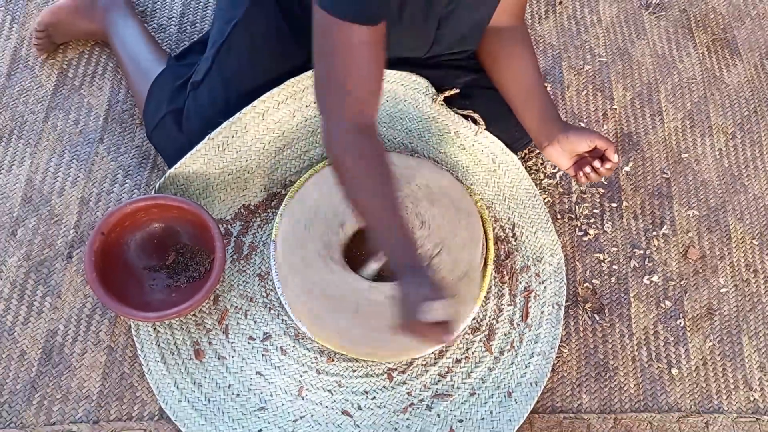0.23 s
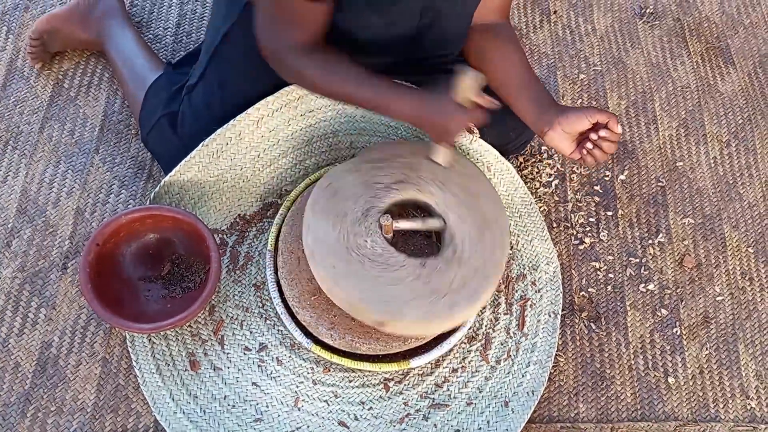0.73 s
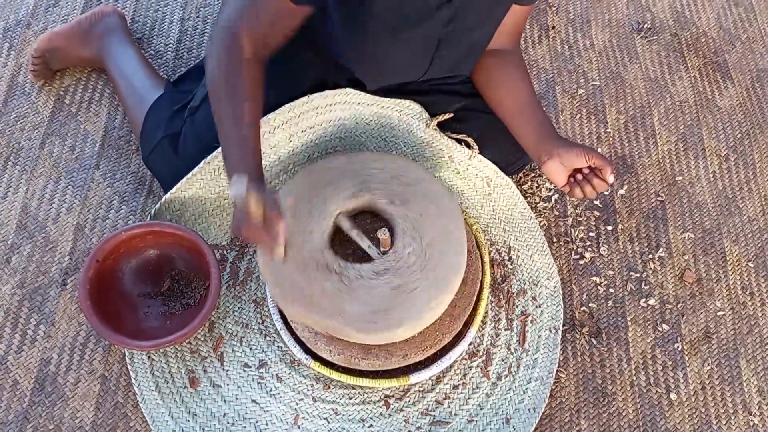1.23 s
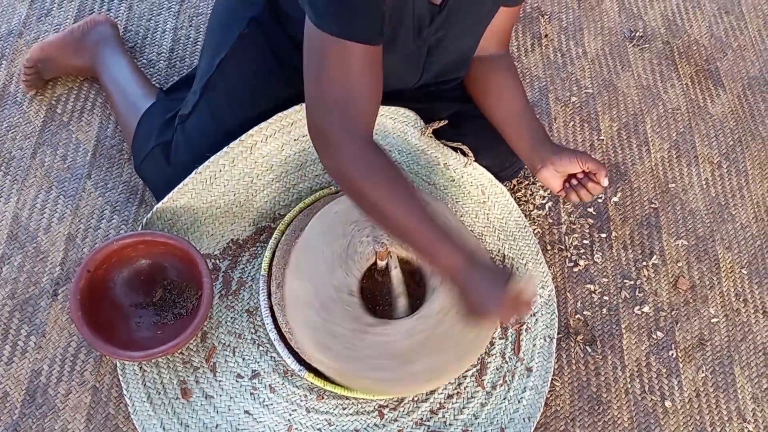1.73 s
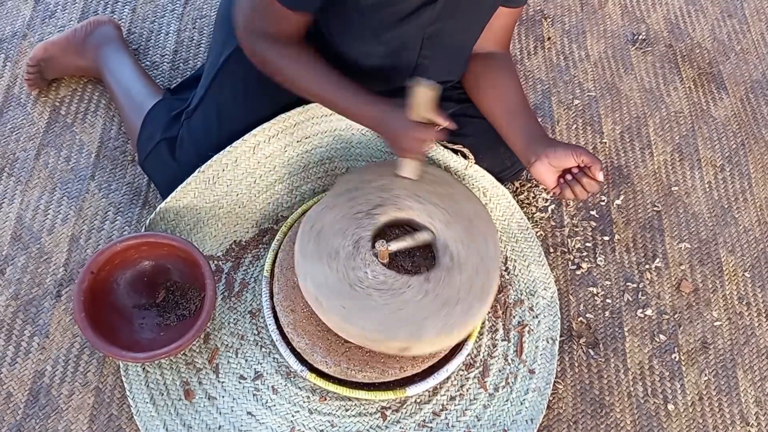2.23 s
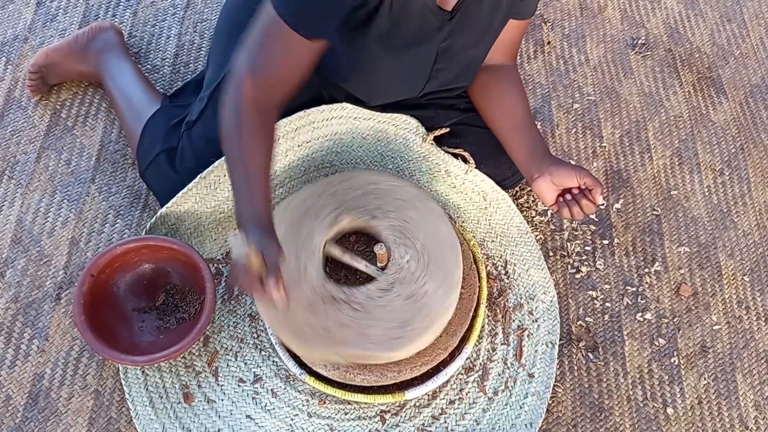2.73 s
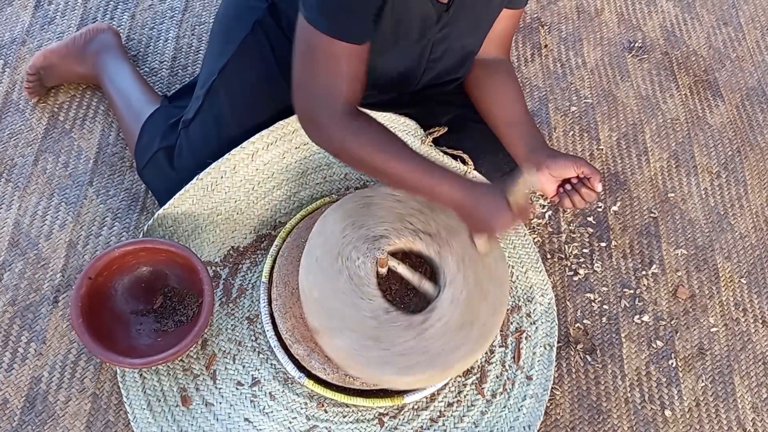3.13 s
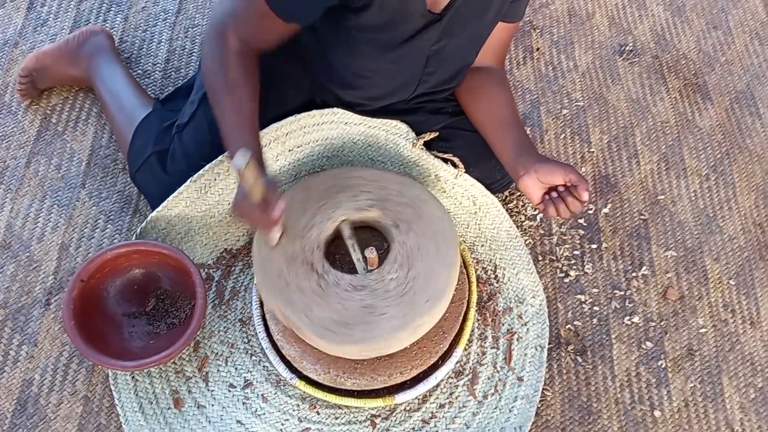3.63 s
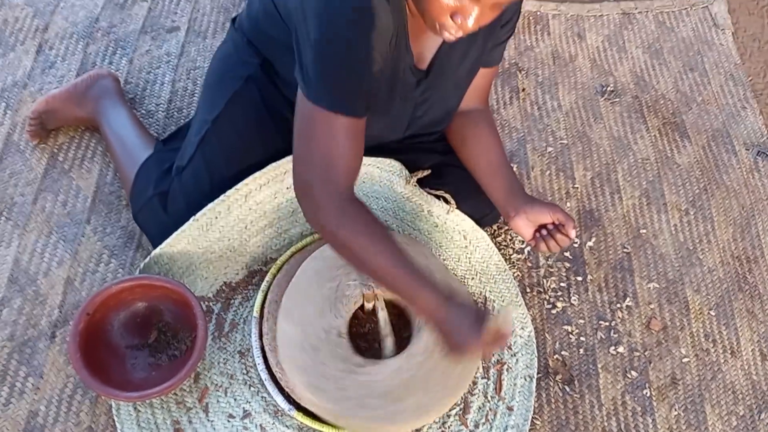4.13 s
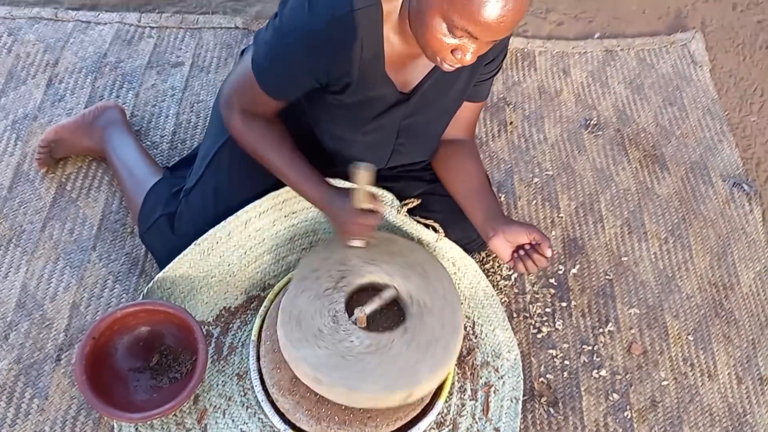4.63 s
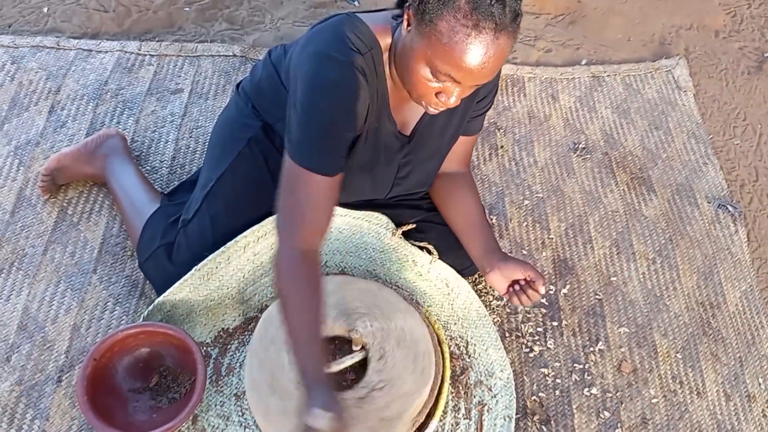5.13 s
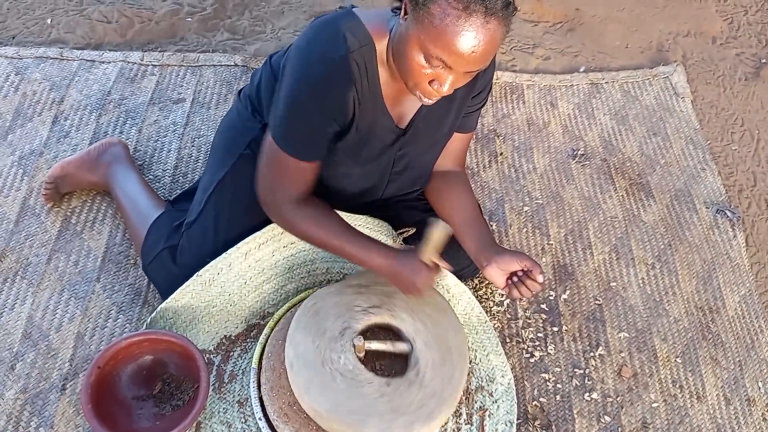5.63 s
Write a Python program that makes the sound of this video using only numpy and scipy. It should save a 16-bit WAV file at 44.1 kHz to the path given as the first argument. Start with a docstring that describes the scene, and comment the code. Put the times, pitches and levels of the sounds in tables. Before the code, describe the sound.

Stone rasps on stone in a rough rhythm, about one turn every 0.8 seconds, with crackling husks, wind thumps and faint bird chirps.

```python
"""A stone hand mill turns outdoors, close by and a little to the right, once round about every 0.8 s.
From the start, grit rolling between the stones makes them rumble and ring while dry spice crackles and snaps.
Light wind, as low turbulent noise, buffets mostly the right microphone port; from 1.6 s a small bird glides far off.
At 2.7 s the runner knocks, a thud with choked ringing, and again very faintly at 3.4 s.
From about 3.3 s the strongest buffets are on the left; the bird stops at 4 s and the mill grinds on."""
import sys
import numpy as np
from scipy import signal
from scipy.fft import rfft, irfft, next_fast_len
from scipy.io import wavfile
from scipy.ndimage import uniform_filter1d

SR = 44100
rng = np.random.default_rng(int(sys.argv[2]) if len(sys.argv) > 2 else 0)


def to_wav(sig):
    """Store sig (one row per channel, or 1-D mono) as 16-bit WAV at the path in sys.argv[1].

    Samples outside -1..1 are clipped; the rate is SR.
    """
    pcm = np.clip(np.atleast_2d(sig), -1, 1) * 32767
    pcm = np.round(pcm).astype(np.int16)
    wavfile.write(sys.argv[1], SR, pcm.T)  # frames by channels


N = 258867
TIME = np.arange(N) / SR


def from_db(db):
    """Decibels to gain."""
    return 10 ** (np.asarray(db) / 20)


def rms_one(x):
    """Scale to unit power."""
    return x / np.sqrt(np.mean(x ** 2) + 1e-20)


def in_time(rows):
    """Each column of a curve table at every sample."""
    s, *columns = np.transpose(rows)
    return [np.interp(TIME, s, column) for column in columns]


def panned(pan_db):
    """Left and right gains whose mean is one; positive leans left."""
    ratio = from_db(np.atleast_1d(pan_db))
    return 2 * np.array([ratio, np.ones_like(ratio)]) / (1 + ratio)


def filtered(x, order, hz, kind):
    """Butterworth filter."""
    return signal.sosfilt(signal.butter(order, hz, kind, fs=SR, output="sos"), x)


def colour(x, points):
    """Filter by a spectrum with one dB column, or one per ear; white noise keeps its power."""
    hz, *columns = np.transpose(points)
    size = next_fast_len(N + SR // 10)
    log_hz = np.log(np.arange(size // 2 + 1) * SR / size + 1)
    curves_db = [np.interp(log_hz, np.log(hz), column) for column in columns]
    gain = rms_one(from_db(curves_db))
    return irfft(rfft(x, size) * gain, size)[:, :N]


def drift(rate):
    """Slow random wander of spread one; a higher rate (Hz) wanders faster."""
    step = 20   # samples between points of the wander
    r = np.exp(-2 * step * np.pi * rate / SR)
    settle = 2000
    noise = rng.standard_normal(N // step + settle + 2)
    slow = signal.lfilter([1], [1, -2 * r, r * r], noise)[settle:]
    return np.interp(np.arange(N) / step, np.arange(len(slow)), rms_one(slow))


def resonate(x, hz, width_hz):
    """One mode; a unit click starts a swing of height one."""
    r = np.exp(-np.pi * width_hz / SR)
    poles = [1, -2 * r * np.cos(2 * np.pi * hz / SR), r * r]
    return signal.lfilter([.5, 0, -.5], poles, x + 1e-18)


def grains(per_s, spread_db):
    """Clicks at random moments, of exponentially spread level in dB."""
    sizes = from_db(spread_db * np.minimum(rng.exponential(1, N), 5))
    return sizes * (rng.random(N) < per_s / SR)


def bursts(clicks, length):
    """Envelope of clicks that each swell and crumble away within about length seconds; unit power."""
    r = np.exp(-1 / (length * SR))
    power = signal.filtfilt([1 - r], [1, -r], clicks ** 2 + 1e-18, padtype=None)
    return rms_one(np.sqrt(power))


def bump(x, width):
    """Smooth rise and fall round zero, of height one."""
    return np.exp(-(x / width) ** 2)


def once_a_turn(turn, at, width):
    """A bump that comes back at the same place in every turn."""
    return bump((turn - at + .5) % 1 - .5, width)


# each turn of the runner, timed where it scrapes hardest; the lean shifts the lesser swell
# from the second mode to the third: start_s, pressure_db, far_side_easing_db, ringing_db, lean_db
TURNS = [(-0.33, -3, 1.5, -4.5, 0.5), (0.565, -0.55, 9, 1, 1.5), (1.333, 1.3, 9.5, 0, 1.5),
         (2.11, 2.14, 6.5, -1.5, 0.5), (2.84, -1, 7.5, -1, -0.5), (3.67, 0, 11, 1.9, 3.5),
         (4.536, 1.3, 11, 0.95, 2.5), (5.40, -1.5, 11, -2.5, 1), (6.25, 1.5, 8.5, 0, -11)]
# the contact favours each of the three low modes twice a turn: rest_db, main_at_turn, main_width_turn,
# main_db, lesser_at_turn, lesser_width_turn, lesser_db, lean_share
MODE_SWELLS = [(-51.5, 0.14, 0.21, 17, .37, .16, 9.5, 0.081), (-54, 0, 0.12, 16, 0.38, 0.38, 19.5, -1.8),
               (-52, 0.11, 0.12, 10, .42, .4, 6, 0.49)]
# the load eases once a turn, as the handle passes the far side
EASE_AT_TURN, EASE_WIDTH_TURN = .3, 0.24
LOAD_WAVER_DB, MODE_WAVER_DB = .5, 1.22


def turning():
    """The angle of the runner sets the load on the grit and how strongly each low mode rings, all in dB."""
    starts, _, easings, _, leans = np.transpose(TURNS)
    pressure_db, _, ringing_db, _ = in_time(TURNS)
    numbers = np.arange(len(TURNS))
    turn = np.interp(TIME, starts, numbers)
    easing_db = np.interp(turn - EASE_AT_TURN, numbers, easings)
    easing_db = easing_db * once_a_turn(turn, EASE_AT_TURN, EASE_WIDTH_TURN)
    load_db = pressure_db - easing_db + LOAD_WAVER_DB * drift(rate=16.6)
    modes_db = []
    for rest_db, main_at, main_width, main_db, lesser_at, lesser_width, lesser_db, share in MODE_SWELLS:
        lean_db = share * np.interp(turn - lesser_at, numbers, leans)
        main_swell_db = main_db * once_a_turn(turn, main_at, main_width)
        lesser_swell_db = (lesser_db + lean_db) * once_a_turn(turn, lesser_at, lesser_width)
        waver_db = MODE_WAVER_DB * drift(rate=9.3)
        modes_db.append(load_db + ringing_db + rest_db + main_swell_db + lesser_swell_db + waver_db)
    return load_db, modes_db


# ringing modes of the stones: pitch_hz, width_hz, relative_db, left_minus_right_db, right_lag_ms
STONE_MODES = [(1182.4, 40, 1, -6, -0.013), (1400.6, 20, 2, -5.5, -0.065), (2222.7, 32, 4, -8.5, -0.072),
               (2935, 80, -13.5, -20, 0.055), (3124, 49, -15, -9, 0.08), (3360, 36, -10, -17, 0.095),
               (3472, 39, -13.5, -20, 0.099), (3940, 69, -15, -9, 0.1)]


def stones(low_modes_db, shrill_db, judder):
    """Grit strikes each mode with its own strength; the contact moves round the rim and favours them in turn."""
    contacts = grains(per_s=2500, spread_db=3.0) * from_db(1.0 * judder)
    out = 0
    for k, (hz, width_hz, level_db, pan_db, lag_ms) in enumerate(STONE_MODES):
        ring = resonate(contacts * rng.standard_normal(N), hz, width_hz)
        # steady power; the turning sets the swells
        ring = ring / np.sqrt(uniform_filter1d(ring ** 2, int(.15 * SR)) + 1e-12)
        swell_db = low_modes_db[k] if k < 3 else shrill_db + 4.2 * drift(rate=10.0)
        ring = ring * from_db(level_db + swell_db)
        right = np.interp(TIME - lag_ms / 1000, TIME, ring)
        out = out + panned(pan_db) * np.array([ring, right])
    # the stones radiate little below their lowest mode
    return filtered(out, 4, 930, "high")


# dull rolling noise of the heavy runner: pitch_hz, relative_db (per Hz)
RUMBLE_COLOUR = [(120, -27), (200, -10.5), (300, -3.5), (415, 5.5), (490, 3.5), (560, -0.5), (640, -21.5),
                 (800, -16), (1050, -14), (1500, -26), (1900, -13.5), (6000, -85)]
# harsh scrape when the stones bite: pitch_hz, relative_db (per Hz)
SCRAPE_COLOUR = [(130, -47), (220, -2.5), (400, -7.5), (620, 2.5), (760, 0), (1050, 4), (1600, 3),
                 (2000, -26), (2800, -6), (4200, -12.5), (6000, -54)]


def rumble(rumble_db, judder):
    """Coarse grains roll under the runner's weight; the harsh scrape grows faster with load, up to a limit."""
    load = grains(per_s=3000, spread_db=1.5) * from_db(2.12 * judder)
    rolling, biting = rms_one(load * rng.standard_normal((2, N)))
    bite_db = np.minimum(1.25 * (rumble_db + 40.5), 7.0) - 43.5
    roll = panned(-2.2) * colour(rolling * from_db(rumble_db), RUMBLE_COLOUR)
    scrape = panned(-4.5) * colour(biting * from_db(bite_db), SCRAPE_COLOUR)
    return roll + scrape


# sandy rubbing of the faces: pitch_hz, left_relative_db, right_relative_db
RUB_COLOUR = [(750, -15, 1.5), (1080, 12, 9), (1780, -1, 8.5), (1970, -8, -31), (2500, -14, -6),
              (3880, -20, 3), (4740, -16, -12.5), (5170, -3.5, -15), (5660, 2, 0.5), (9000, -38, 4.5)]


def rubbing(sand_db, judder):
    """Fine sand rasps between the faces, harder when they press and crush."""
    flicker = from_db(5.3 * judder + 1.0 * drift(rate=99))
    sand = bursts(grains(per_s=2600, spread_db=-3.5), length=0.00054) * flicker
    return colour(sand * rng.standard_normal((2, N)) * from_db(sand_db - 12.0), RUB_COLOUR)


# grit that pings between the faces: pitch_hz, relative_db
PING_LEVELS = [(1500, 7), (1900, -12), (2600, 0), (3100, 2.5), (3500, 4.5), (4000, 0), (4600, -3.5),
               (6500, -5.5)]
# hard grains squeak between the faces: centre_s, half_length_s, pitch_hz, relative_db
SQUEAKS = [(0.122, 0.0088, 2520, -36.5), (0.27, .025, 4020, -44), (1.975, 0.049, 1700, -48)]


def pings(shrill_db):
    """Hard grains ring briefly at many pitches; a few stick and squeak, as doubly resonated noise."""
    out = 0
    for hz in np.geomspace(1550, 6500, num=60):
        strikes = grains(per_s=30, spread_db=2.0) * rng.standard_normal((2, N))
        ring = rms_one(resonate(strikes, hz, width_hz=60))
        out = out + ring * from_db(np.interp(hz, *np.transpose(PING_LEVELS)))
    out = rms_one(out) * from_db(shrill_db - 9.0)
    for s, half_length, hz, level_db in SQUEAKS:
        squeak = resonate(rng.standard_normal((2, N)), hz, width_hz=170)
        squeak = rms_one(resonate(squeak, hz, width_hz=170))
        out = out + squeak * from_db(level_db + 2.0) * bump(TIME - s, half_length)
    return panned(-1.5) * out


# how much spice is breaking between the stones: time_s, relative_db
FEED = [(0.0, -44.5), (0.64, -41), (1.91, -40), (2.43, -42.5), (2.94, -43), (3.16, -42.5), (3.47, -43),
        (3.91, -43.5), (4.5, -40.5), (4.77, -43), (4.94, -44.5), (5.18, -40), (5.62, -42.5), (5.87, -40.5)]
# a cluster of husks is crushed: centre_s, half_length_s, level_db
CRUNCHES = [(0.117, .03, -34), (0.564, .03, -36.5), (0.976, 0.013, -29.5), (1.75, 0.029, -28),
            (2.853, .02, -36), (4.467, 0.041, -29.5), (5.035, 0.039, -33), (5.58, 0.0087, -32.5)]
FEED_GAIN_DB, FEED_FOLLOWS_LOAD = 3.5, 0.14   # the second is dB of crackle per dB of load


def breaking(load_db):
    """Level of the crackle in dB: it follows feed and load, and flares when a cluster of husks gives way."""
    steady = from_db(in_time(FEED)[0] + FEED_GAIN_DB + FEED_FOLLOWS_LOAD * load_db)
    power = steady ** 2
    for s, half_length, level_db in CRUNCHES:
        power = power + (from_db(level_db) * bump(TIME - s, half_length)) ** 2
    return 10 * np.log10(power)


# breaking spice: pitch_hz, left_relative_db, right_relative_db
CRUSH_COLOUR = [(1500, -20, -41), (4000, -25, -9), (5700, -17, -25), (6460, -27, -13.5), (7420, -14.5, -1),
                (8750, -36, 3), (10000, -7, -1), (10300, -19, -2.5), (12300, -11, 1.5), (14600, -9.5, -3.5),
                (16100, -31.5, -18)]


def crushing(crush_db, judder):
    """Husks break in clumps of tiny cracks; some clumps sound brighter than others."""
    clumps = from_db(1.0 * judder + 1.0 * drift(rate=28))
    crackle = rms_one(bursts(grains(per_s=5200, spread_db=3.0), length=.0001) * clumps)
    sound = colour(crackle * from_db(crush_db) * rng.standard_normal((2, N)), CRUSH_COLOUR)
    fine = signal.sosfiltfilt(signal.butter(3, 10500, "high", fs=SR, output="sos"), sound)
    tilt = from_db(1.3 * drift(rate=40))
    return fine * tilt + (sound - fine) / tilt


# the loudest seeds that snap: start_s, relative_db
SNAPS = [(0.182, -16), (0.2114, -9), (0.3356, -15), (0.5606, -12), (0.7038, -16), (0.9053, -19),
         (0.9194, -17), (0.9622, -16), (1.1623, -14), (1.5329, -16), (1.5559, -18), (1.5953, -18),
         (1.6472, -8), (1.7285, -17), (1.7669, -16), (1.8876, -18), (2.3635, -16), (2.8389, -16),
         (3.0624, -22), (3.9519, -22), (4.0607, -21), (4.4368, -20), (4.4498, -16), (4.7536, -20),
         (5.036, -14), (5.6905, -18)]
SMALL_SNAP_COUNT, SMALL_SNAP_DB = 30, 16.5   # dB relative to the crackle level at that moment
SNAP_S, SNAP_GAIN_DB, CRUMBLE_DB, SNAP_LOW_HZ = 0.00087, -2, -23, 7400


def snaps(crush_db):
    """A seed gives way in a short bright burst, then a duller crunch as it crumbles; small ones snap at random."""
    crack, crumble = np.zeros((2, N))
    moments = rng.integers(0, N, size=SMALL_SNAP_COUNT)
    small = [(TIME[i], crush_db[i] + SMALL_SNAP_DB) for i in moments]
    for s, level_db in list(SNAPS) + small:
        span = slice(int((s - .01) * SR), int((s + .06) * SR))
        age = TIME[span] - s - 1.25 * SNAP_S   # from the middle of the crack
        crack[span] += from_db(level_db) * np.exp(-np.pi / 2 * (age / SNAP_S) ** 2)
        crumble[span] += from_db(level_db) * (age > 0) * np.exp(-abs(age) / 0.0082)
    shards = rng.choice([-1, 1], (2, N))   # pressure flips at random inside a crack
    bright = filtered(crack * shards, 2, SNAP_LOW_HZ, "high")
    pieces = crumble * from_db(CRUMBLE_DB) * rng.standard_normal((2, N))
    return colour(bright * from_db(SNAP_GAIN_DB), CRUSH_COLOUR) + colour(pieces, RUB_COLOUR)


# the runner knocks on its seat: start_s, relative_db
KNOCKS = [(2.7120, -11.5), (3.372, -29)]


def knocks():
    """A soft, heavy blow: a short woody thud, and the stone modes choked by the contact."""
    blows = np.zeros(N)
    for s, level_db in KNOCKS:
        blows[int(s * SR)] = from_db(level_db)
    thud = resonate(blows, hz=950, width_hz=320) + resonate(blows, hz=486, width_hz=330)
    thud = from_db(2.5) * thud
    ring = 0
    for hz, width_hz, level_db, pan_db, _ in STONE_MODES:
        mode = resonate(blows, hz, width_hz * 1.04)   # slightly more damped
        ring = ring + panned(pan_db) * from_db(level_db - 11.0) * mode
    return filtered(panned(-3.0) * thud - ring, 2, [300, 2500], "band")


# low turbulence: pitch_hz, relative_db (per Hz)
WIND_COLOUR = [(15, -42), (30, -28), (50, -2.5), (70, 3), (95, -1), (125, -2), (170, -16), (250, -17.5),
               (500, -32), (1500, -81)]
# puffs of wind on the ports: centre_s, half_length_s, level_db, left_minus_right_db
GUSTS = [(0.136, 0.13, -41.5, -7), (0.47, 0.14, -36, -30), (0.75, 0.15, -42, -5),
         (0.948, 0.092, -40.5, -36), (1.247, 0.63, -43.5, -7.5), (1.745, 0.23, -37.5, -19),
         (2.15, 0.42, -44.5, -27), (2.74, 0.061, -43.5, 12), (3.095, 0.22, -36.5, -14),
         (3.31, 0.074, -37, 5), (3.474, 0.11, -42, -9), (3.722, .1, -39.5, -15), (3.87, 0.06, -39, 8),
         (4.15, 0.2, -33, 15), (4.484, 0.14, -32, 25), (4.792, 0.073, -36.5, 18), (5.226, 0.19, -41.5, 22),
         (5.696, 0.093, -47, 25)]
# single eddies that hit a port: centre_s, peak_db, left_minus_right_db, swing_hz
BUFFETS = [(0.455, -24, -25, 110), (0.510, -20, -25, 110), (1.705, -18, -25, 90), (1.822, -20, -25, 115),
           (3.290, -16, 25, 80), (4.162, -16, 25, 85), (4.251, -16, 25, 85), (4.357, -16, 25, 105),
           (4.457, -16, 25, 105), (4.528, -11.5, 25, 90), (4.81, -25, 20, 90), (5.462, -32, -20, 140)]
BREEZE_DB = -52.5   # the air between puffs
WIND_WAVER_DB, EDDY_S = 1.3, .009


def wind():
    """Lumpy low turbulence, unrelated at the two ports, comes in puffs; single eddies are short pressure swings."""
    lumps = rms_one(rng.standard_normal((2, N)) * from_db(2.0 * drift(rate=52)))
    lumps = colour(lumps, WIND_COLOUR)
    power = from_db(BREEZE_DB) ** 2
    for s, half_length, level_db, side_db in GUSTS:
        puff = from_db(level_db) * bump(TIME - s, half_length)
        power = power + (panned(side_db) * puff) ** 2
    steady = lumps / np.sqrt(uniform_filter1d(lumps ** 2, int(.16 * SR)))
    out = steady * np.sqrt(power) * from_db(WIND_WAVER_DB * drift(rate=12))
    for s, peak_db, side_db, hz in BUFFETS:
        swing = np.cos(2 * np.pi * hz * (TIME - s)) * bump(TIME - s, EDDY_S)
        out = out + .5 * panned(side_db) * from_db(peak_db) * swing
    return out


# bird notes: start_s, length_s, start_hz, end_hz, level_db, octave_overtone_db
CHIRPS = [(1.58, .08, 2700, 2480, -43, -22), (1.685, .08, 2780, 2600, -44, -22),
          (2.47, .1, 2600, 3000, -47, -13), (2.71, .1, 2850, 3250, -48, -8),
          (2.95, .1, 2900, 3250, -47, -8), (3.19, .1, 3030, 3300, -47, -6), (3.43, .1, 3170, 3420, -48, -6),
          (3.69, .1, 3200, 3400, -47, -5), (3.97, .1, 3150, 3350, -49, -6)]


def bird():
    """Short glides with an octave overtone, slightly hoarse from a fast random quaver of pitch."""
    out = np.zeros(N)
    quaver_hz = 40 * drift(rate=200)
    for s, length, start_hz, end_hz, level_db, octave_db in CHIRPS:
        u = np.linspace(0, 1, int(length * SR))
        span = slice(int(s * SR), int(s * SR) + len(u))
        pitch_hz = start_hz + (end_hz - start_hz) * np.sin(np.pi / 2 * u) + quaver_hz[span]
        phase = 2 * np.pi * np.cumsum(pitch_hz) / SR
        tone = np.sin(phase) + from_db(octave_db) * np.sin(2 * phase)
        out[span] += from_db(level_db) * np.sin(np.pi * u) * tone
    return panned(1.2) * out


def scene():
    """The runner judders as it rides over the seeds, shaking ringing, rumble, sand and crackle together."""
    load_db, low_modes_db = turning()
    _, second_db, third_db = low_modes_db
    rumble_db = -41.5 + load_db
    crush_db = breaking(load_db)
    judder = drift(rate=18.4)
    # hard contact brings out the high modes and the sand
    shrill_db = 0.23 * second_db + 0.32 * third_db + 0.37 * crush_db
    # loose sand also follows the rolling weight
    sand_db = .5 * shrill_db + .5 * rumble_db + 5.0
    mill = stones(low_modes_db, shrill_db, judder) + rumble(rumble_db, judder)
    grit = rubbing(sand_db, judder) + pings(shrill_db)
    spice = crushing(crush_db, judder) + snaps(crush_db)
    return mill + grit + spice + knocks() + wind() + bird()


CUTOFF_HZ = 15900


def record(dry):
    """The top is cut steeply by an elliptic low-pass."""
    return signal.sosfilt(signal.ellip(10, .2, 80, CUTOFF_HZ, fs=SR, output="sos"), dry)


dry = scene()
out = record(dry)
to_wav(out)
```